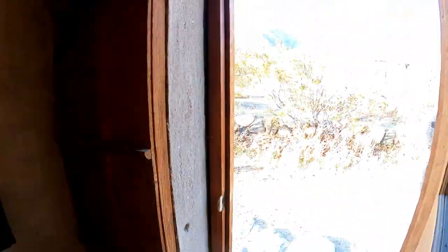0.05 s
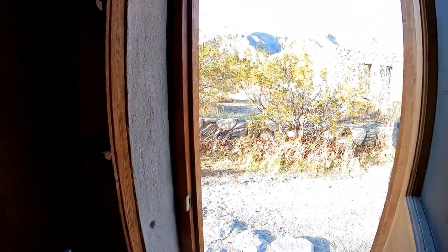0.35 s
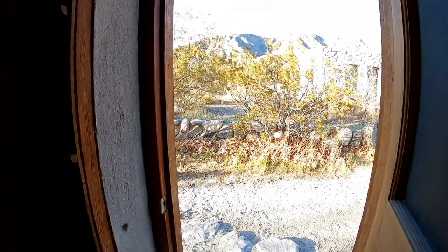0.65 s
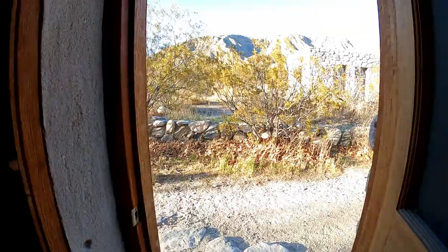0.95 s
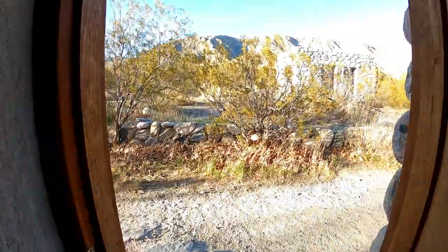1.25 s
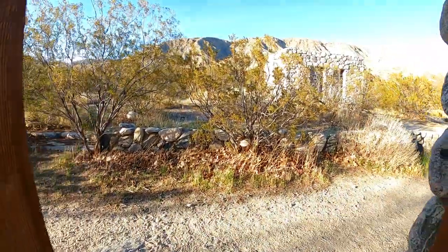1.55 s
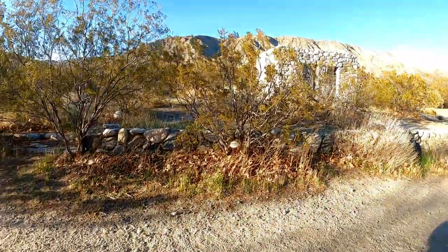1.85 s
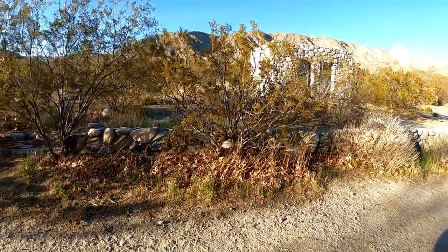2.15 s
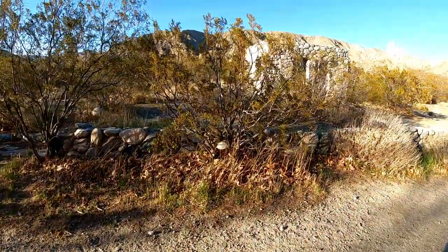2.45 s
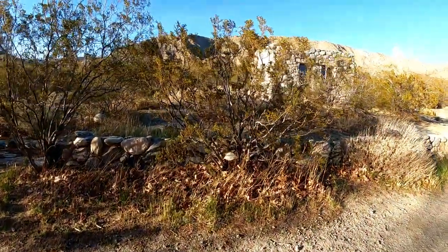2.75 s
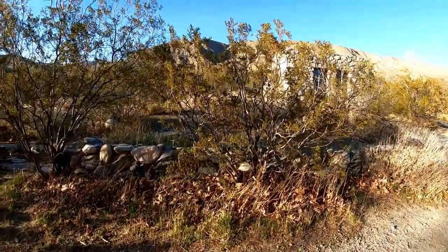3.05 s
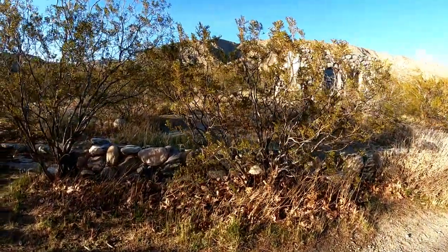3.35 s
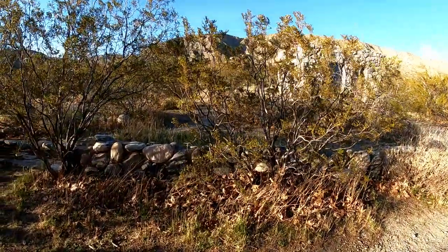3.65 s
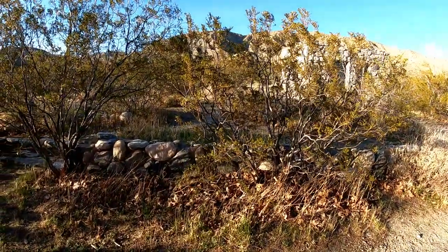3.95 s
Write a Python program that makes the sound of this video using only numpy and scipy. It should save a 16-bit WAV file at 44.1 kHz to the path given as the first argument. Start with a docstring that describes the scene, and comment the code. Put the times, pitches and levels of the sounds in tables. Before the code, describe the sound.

Quiet steps and shoe scuffs, then a wooden door slams with a rattling boom.

```python
"""Air hisses and clothes swish as someone steps out over a wooden threshold into a quiet desert yard.
The first footfall rings the hollow floor; shoes scuff and knock on boards and stones over a soft drone.
At about 3.4 s the door swings shut behind them: the latch scrapes, the leaf bangs into its frame and
rattles, and the room booms. The gain control clamps down on the bang and leaves the hiss ducked."""
import sys
import numpy as np
from scipy import signal
from scipy.fft import rfft, irfft
from scipy.io import wavfile
from scipy.ndimage import uniform_filter1d

SR = 44100
rng = np.random.default_rng(int(sys.argv[2]) if len(sys.argv) > 2 else 0)


def materialize(psi):
    """Save the field psi as 16-bit PCM at rate SR to the path in sys.argv[1].

    A 1-D psi becomes a single channel; in a 2-D psi each row is a channel.
    """
    bounded = np.clip(np.atleast_2d(psi).T, -1, 1)
    quanta = np.round(bounded * 32767).astype(np.int16)
    wavfile.write(sys.argv[1], SR, quanta)


N = 176400
T = np.arange(N) / SR
SHOT_T = T[:SR]  # every one-shot lasts a second


def amp(db):
    """Decibels to gain."""
    return 10 ** (np.asarray(db) / 20)


def unit_rms(x):
    """Scales to an rms of one."""
    return x / np.sqrt(np.mean(x ** 2) + 1e-20)


def bin_hz(size):
    """FFT bin frequencies, raised 1 Hz to keep their log finite."""
    return np.fft.rfftfreq(size, 1 / SR) + 1


def curve_at(points, hz):
    """Reads a curve along log frequency."""
    freqs, values = np.transpose(points)
    return np.interp(np.log(hz), np.log(freqs), values)


def fader(points):
    """A level ride (time_s, level_db) as gain over the whole scene."""
    return amp(np.interp(T, *np.transpose(points)))


def place(mix, start_s, sound):
    """Mixes a sound in at its cue, trimming any overhang."""
    at = round(start_s * SR)
    sound, part = sound[max(-at, 0):], mix[max(at, 0):]
    part[:len(sound)] += sound[:len(part)]


def cut(x, hz, kind, order):
    """Low-pass or high-pass filter."""
    return signal.sosfilt(signal.butter(order, hz, kind, fs=SR, output="sos"), x)


def noise(eq, size=SR):
    """Unit-rms noise coloured by an EQ curve."""
    white = rfft(rng.standard_normal(size))
    return unit_rms(irfft(white * amp(curve_at(eq, bin_hz(size))), size))


def noise_band(hz, octaves, size=SR):
    """Unit-rms noise in a bell around hz."""
    distance = np.log2(bin_hz(size) / hz) / octaves
    white = rfft(rng.standard_normal(size))
    return unit_rms(irfft(white * np.exp(-0.5 * distance ** 2), size))


def attack(rise_s):
    """Onset envelope easing up to full level."""
    return 1 - np.exp(-SHOT_T / rise_s)


def decay(t60_s):
    """Envelope falling 60 dB in t60_s."""
    return np.exp(-np.log(1000) * SHOT_T / t60_s)


def ring(hz, t60_s):
    """One dying mode."""
    return np.sin(2 * np.pi * hz * SHOT_T) * decay(t60_s)


def noise_tail(eq, decays):
    """Noise in which each octave dies at its own speed."""
    spectrum, centres_hz = rfft(noise(eq)), np.geomspace(50, 12800, 9)
    out = np.zeros(SR)
    for hz, solo in zip(centres_hz, np.eye(len(centres_hz))):
        crossover = np.interp(np.log(bin_hz(SR)), np.log(centres_hz), solo)
        out += irfft(spectrum * crossover, SR) * decay(curve_at(decays, hz))
    return out


# Tone of the air bed and of the cloth swish: freq_hz, gain_db
AIR_EQ = [(30, -26), (80, -18.5), (150, -6), (280, 2.5), (550, 2), (1000, -4.5), (2000, -4.5), (3400, -9),
          (4800, -13.5), (7300, -19), (8800, -32), (12000, -37.5), (14200, -50)]
CLOTH_EQ = [(1500, -3), (3000, -3.5), (4600, 0.5), (7300, -9), (8800, -16.5), (11800, -12.5), (13000, -17),
            (14200, -39)]
# Their fader rides: time_s, level_db
AIR_RIDE = [(0, -49.5), (.35, -51), (.62, -49), (.8, -49.5), (.93, -54), (1.06, -51.5), (1.2, -47),
            (1.5, -48), (1.8, -46.5), (2.1, -48.5), (2.4, -49), (2.58, -50), (2.75, -49.5), (3.0, -51),
            (3.25, -48.5), (3.6, -53), (4, -52.5)]
CLOTH_RIDE = [(0, -67), (.17, -57), (.25, -52.5), (.38, -55.5), (.62, -51.5), (.78, -56.5), (.92, -62),
              (1.25, -58.5), (1.45, -63), (1.6, -55.5), (1.8, -71), (1.95, -55), (2.25, -63.5),
              (2.43, -47.5), (2.6, -60), (3.1, -60.5), (3.39, -53), (3.7, -77)]


def air_and_clothes():
    """A bed of air hiss under the brighter swish of moving clothes."""
    return fader(AIR_RIDE) * noise(AIR_EQ, N) + fader(CLOTH_RIDE) * noise(CLOTH_EQ, N)


# Tone of the crunchy grit and of the dull rub: freq_hz, gain_db
GRIT_EQ = [(300, 4), (1000, -6), (2300, 4), (3800, -1), (5300, -3), (7000, -13), (8600, -26), (12000, -27),
           (14000, -30)]
RUB_EQ = [(50, -12), (120, -4.5), (280, 0), (500, -3.5), (800, -10.5), (1150, -8.5), (2000, -20),
          (5000, -27), (14000, -84)]
# Sole slides: start_s, length_s, grit_db, rub_db
SCUFF_CUES = [(-.02, 0.11, -63, -39), (1.189, 0.2, -60, -42), (1.375, 0.038, -45, -50),
              (1.554, 0.045, -64, -44.5), (1.652, 0.082, -43.5, -49.5), (1.696, 0.04, -44, -41),
              (1.902, 0.042, -46.5, -50), (1.937, 0.065, -68, -46), (2.291, 0.065, -49.5, -52),
              (2.399, 0.031, -38, -43), (2.42, 0.039, -59, -39), (2.458, 0.051, -39, -38),
              (2.693, .09, -67, -53.5)]


def scuffs():
    """A sole drags over grit: a grainy swell of crunch and low rub."""
    out = np.zeros(N)
    grain_depth_db = 2.5
    for start_s, length_s, grit_db, rub_db in SCUFF_CUES:
        swell = np.sin(np.pi * np.minimum(SHOT_T / length_s, 1)).clip(0) ** 0.45
        flicker = unit_rms(uniform_filter1d(rng.standard_normal(SR), size=90))
        grains = unit_rms(amp(grain_depth_db * flicker))
        friction = amp(grit_db) * noise(GRIT_EQ) + amp(rub_db) * noise(RUB_EQ)
        place(out, start_s, swell * grains * friction)
    return out


# Shoes on boards and stones: start_s, click_db, click_hz, thump_db, thump_hz
STEP_CUES = [(0.015, -42.5, 1120, -33, 262), (.046, -40, 1060, -37, 275), (.064, -42, 900, -31.5, 197),
             (.696, -44, 700, -41.5, 170), (1.277, -33.5, 1130, -27.5, 232), (1.381, -27.5, 2130, -44, 147),
             (1.908, -53, 2200, -36.5, 265), (1.985, -38, 550, -36, 286), (2.0148, -43, 480, -29.5, 245),
             (2.389, -35.5, 1630, -29.5, 279), (2.424, -35, 1280, -23, 288), (2.44, -48, 600, -18, 244),
             (2.46, -32.5, 1220, -26, 257), (2.6094, -23, 1710, -20, 210), (3.127, -38, 870, -36.5, 351),
             (3.1465, -30.5, 600, -43, 285), (3.1654, -29.5, 1167, -25.5, 183),
             (3.3742, -36, 2080, -39, 323), (3.7989, -31.5, 940, -23, 520), (3.932, -39.5, 1370, -51, 198)]


def footsteps():
    """A shoe clicks dully on contact and the ground answers with a short two-mode thump."""
    out = np.zeros(N)
    click_t60_s, thump_t60_s = 0.025, 0.042
    for start_s, click_db, click_hz, thump_db, thump_hz in STEP_CUES:
        click = noise_band(click_hz, octaves=0.99) * decay(click_t60_s)
        click += ring(click_hz, click_t60_s / 2)
        click = cut(click, 1.89 * click_hz, "low", order=4)
        thump = ring(thump_hz, thump_t60_s) + amp(-4) * ring(1.452 * thump_hz, thump_t60_s)
        thump *= attack(rise_s=0.002)
        place(out, start_s, amp(click_db) * click + amp(thump_db) * thump / abs(thump).max())
    return out + room_reverb(out, send_db=-20)


# Boomy tone of the room: freq_hz, gain_db
ROOM_EQ = [(40, -8), (100, 15.5), (160, -1), (300, 3), (700, 0.5), (2000, 1), (5000, 1), (12000, -1.5)]
# Its reverb time: freq_hz, t60_s
ROOM_DECAY = [(60, 0.5), (160, 0.68), (500, 0.64), (1200, 0.29), (4000, 0.31), (12000, 0.38)]


def room_reverb(x, send_db):
    """The room's reflections build up, then die away with the lows hanging longest."""
    impulse = noise_tail(ROOM_EQ, ROOM_DECAY) * attack(rise_s=0.018)
    return amp(send_db) * signal.fftconvolve(x, impulse / np.linalg.norm(impulse))[:N]


# Fader ride of the indoor drone: time_s, level_db
DRONE_RIDE = [(0, -58), (.25, -51.5), (.55, -57), (.83, -57), (.93, -73), (1.2, -52), (1.5, -65), (4, -70)]


def hollow_floor():
    """The first footfall leaves the floor ringing, and a low drone lingers indoors."""
    out = fader(DRONE_RIDE) * noise_band(hz=268, octaves=0.16, size=N)
    place(out, start_s=0.02016, sound=amp(-33) * ring(hz=292, t60_s=0.67))
    return out


# Bright tone of the latch's scrape and snap: freq_hz, gain_db
LATCH_EQ = [(200, -17.5), (700, -5), (1900, 7.5), (3500, -5), (4700, 0), (6000, -6), (7500, -8.5),
            (8600, -26), (12000, -23), (14000, -45)]
# Metal ring of the latch: pitch_hz, level_db, t60_s
LATCH_MODES = [(669, -25, 0.18), (1417, -25, .08), (1950, -22.5, 0.062), (2729, -24, 0.092),
               (3225, -27, .07), (4470, -27, 0.051), (5650, -26, 0.041)]


def latch_scrape():
    """The latch scrapes and rings as it rides over its plate."""
    scrape = amp(-25.5) * noise(LATCH_EQ) * decay(t60_s=0.1)
    metal = sum(amp(db) * ring(hz, t60_s) for hz, db, t60_s in LATCH_MODES)
    return (scrape + metal) * attack(rise_s=0.002)


# Modes struck by each hit, one list each: pitch_hz, level_db, t60_s (a 51 Hz room boom, then the wooden modes
# of the door leaf)
LEAF_PITCHES = [51, 92, 146, 160, 183, 226, 252, 307, 374, 500, 613, 645, 733, 804, 1001, 1124, 1216, 1397,
                1771, 2048, 2735]
LEAF_LEVELS = [-20, -23, -11, -7, 0, -4, -4, -14, -11.5, -22, -7.5, -13.5, -16.5, -14, -18, -9.5, -10, -13,
               -12, -16, -31]
LEAF_DECAYS = [0.39, 0.2, .3, .16, 0.08, .1, 0.11, 0.22, 0.3, 0.32, 0.24, 0.42, 0.3, 0.14, .2, 0.077, 0.091,
               0.056, 0.085, .13, .15]


def door_leaf():
    """The struck leaf: low modes, with the room's 51 Hz boom, give the thud; high ones of alternating polarity
    the panel ring."""
    split_hz = 450
    thud, panel = np.zeros((2, SR))
    for k, (hz, db, t60_s) in enumerate(zip(LEAF_PITCHES, LEAF_LEVELS, LEAF_DECAYS)):
        mode = amp(db) * ring(hz, t60_s)
        if hz < split_hz:
            thud += mode
        else:
            panel += (-1) ** k * mode
    return thud * attack(rise_s=0.0029), panel


# Tone of the dense clatter of boards, latch and room: freq_hz, gain_db
CLATTER_EQ = [(60, -22), (200, -2), (450, -2), (700, -0.5), (900, -6), (1150, 0.5), (1450, -7.5),
              (1900, -5.5), (2800, -19.5), (5000, -30), (8000, -44.5), (14000, -63)]
# Its ring-out: freq_hz, t60_s
CLATTER_DECAY = [(200, 0.24), (1200, 0.049), (4000, 0.21), (12000, 0.091)]
# The leaf banging and rattling in its frame: start_s, thud_db, clatter_db, snap_db
DOOR_HITS = [(3.416, -46, -19, -19.5), (3.429, -18.5, -26, -24), (3.449, -18, -13.5, -9.5),
             (3.4545, 2, -1.5, -35), (3.467, -4.5, -17, -31), (3.491, -17, -18, -36),
             (3.521, -7.5, -17.5, -44), (3.546, -8, -27, -33), (3.566, -18, -12, -18),
             (3.583, -22.5, -25, -34), (3.621, -25, -29, -58), (3.641, -28, -26, -52),
             (3.717, -27, -33.5, -62), (3.729, -51, -38, -52)]


def door_slam():
    """The latch scrapes in; each hit rings the leaf, shakes the boards and snaps the latch."""
    out = np.zeros(N)
    thud, panel = door_leaf()
    for start_s, thud_db, clatter_db, snap_db in DOOR_HITS:
        clatter = (noise_tail(CLATTER_EQ, CLATTER_DECAY) + amp(-3.5) * panel) * attack(rise_s=0.00068)
        snap = noise(LATCH_EQ) * decay(t60_s=0.015)
        place(out, start_s, amp(thud_db) * thud + amp(clatter_db) * clatter + amp(snap_db) * snap)
    place(out, start_s=3.4155, sound=latch_scrape())
    return out + room_reverb(out, send_db=-11)


def gain_control(x, threshold_db=-7.5, recovery_db_per_s=1):
    """A limiter that grabs a peak at once and lets the level creep back."""
    power_db = 10 * np.log10(abs(uniform_filter1d(x ** 2, size=260)) + 1e-12)
    recovery_db = recovery_db_per_s * T
    held_db = np.maximum.accumulate(power_db + recovery_db) - recovery_db
    reduction_db = np.maximum(held_db - threshold_db, 0)
    return x / amp(uniform_filter1d(reduction_db, size=60))


def scene():
    """Mono mix of all layers, with the deep bass rolled off the footwork."""
    door = door_slam()
    footwork = cut(footsteps() + scuffs(), hz=126, kind="high", order=3)
    return (door + footwork + hollow_floor() + air_and_clothes())[None]


def record(dry):
    """Microphone colour (a treble notch, both ends rolled off), gain control, then a steep top cut."""
    x = signal.lfilter(*signal.iirnotch(9250, Q=13.5, fs=SR), dry[0])
    x = cut(x, hz=39, kind="high", order=5)
    x = cut(x, hz=12600, kind="low", order=8)
    top_cut = signal.firwin(511, cutoff=14300, window=("kaiser", 9), fs=SR)
    return signal.oaconvolve(gain_control(x), top_cut, "same")[None]


dry = scene()
out = record(dry)
materialize(out)
```